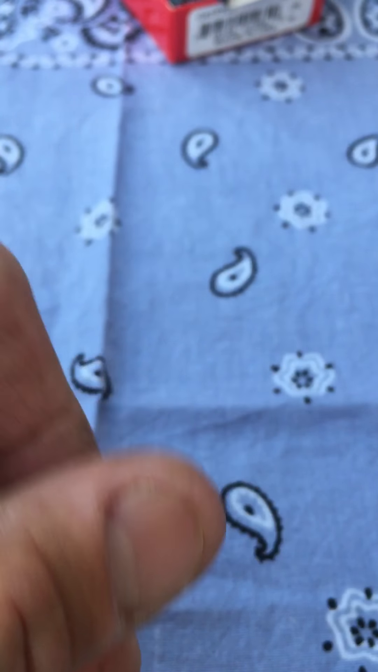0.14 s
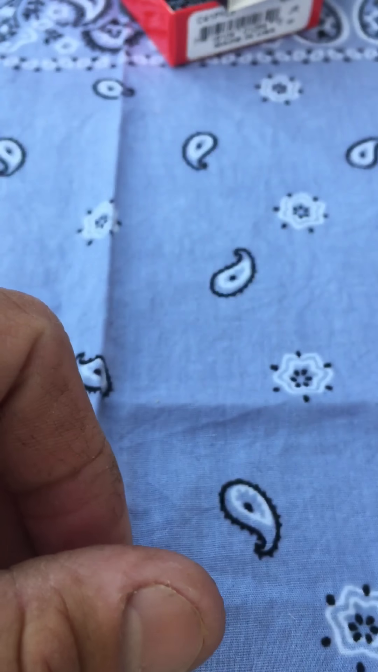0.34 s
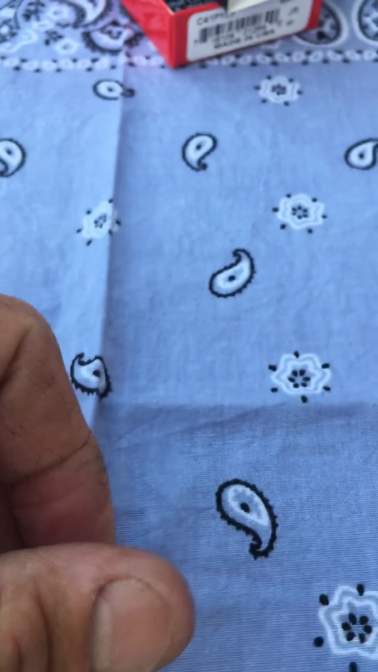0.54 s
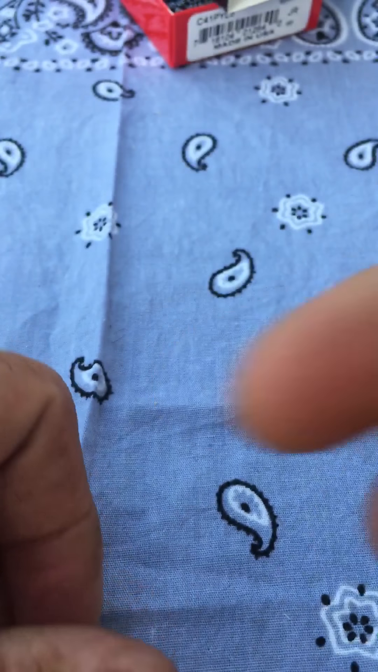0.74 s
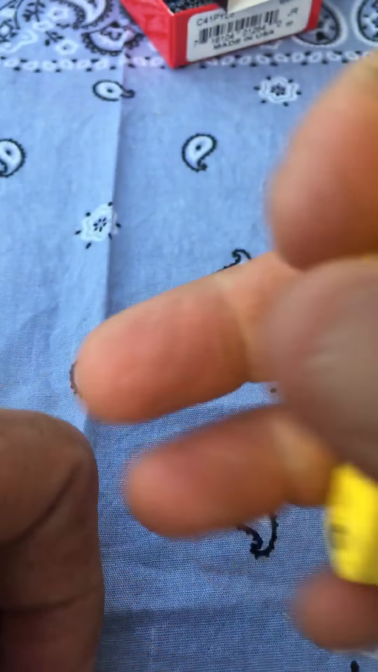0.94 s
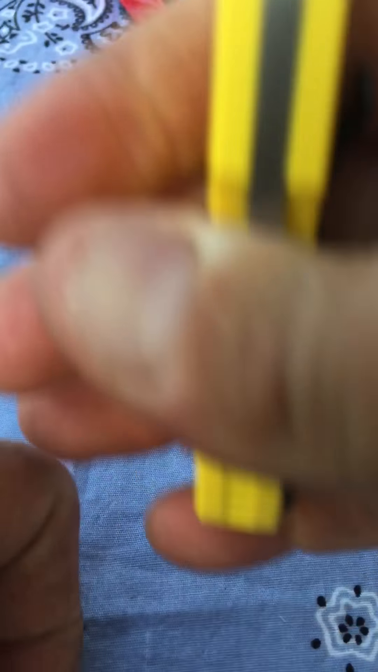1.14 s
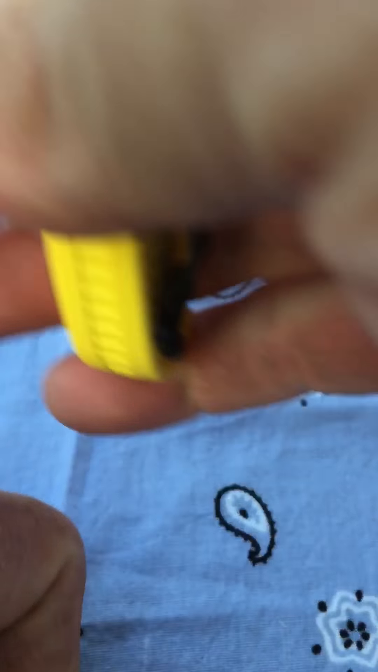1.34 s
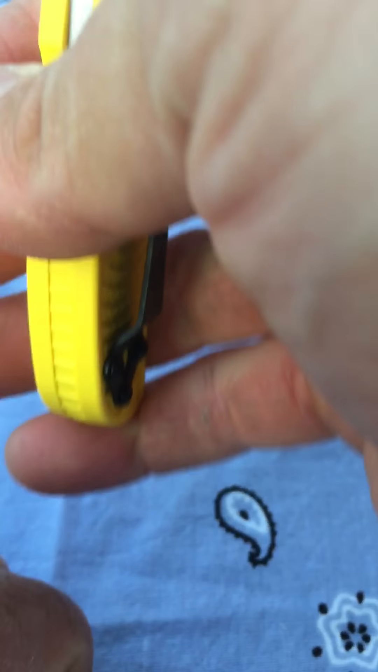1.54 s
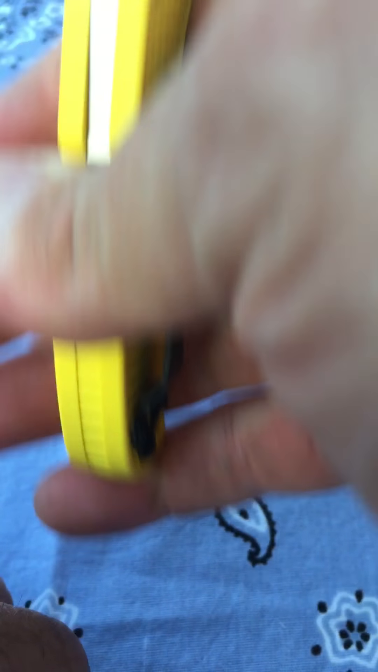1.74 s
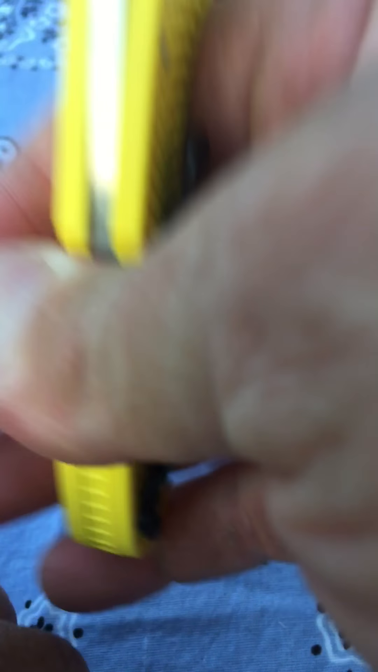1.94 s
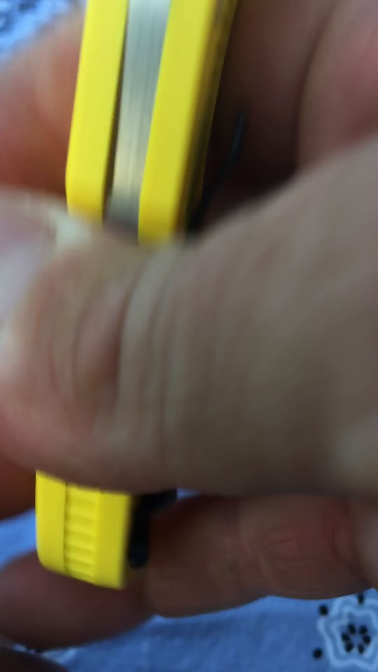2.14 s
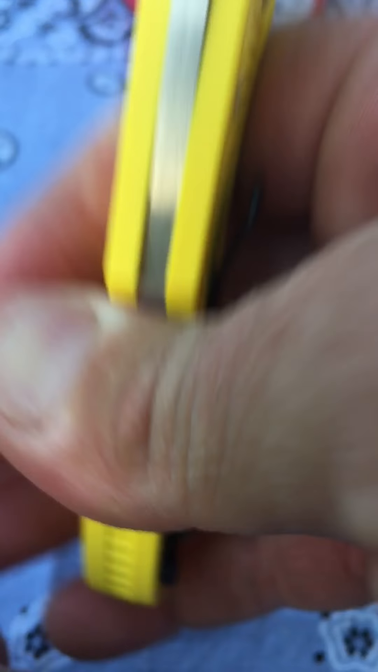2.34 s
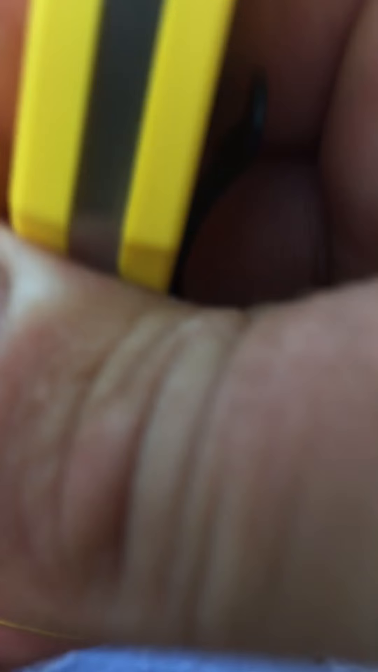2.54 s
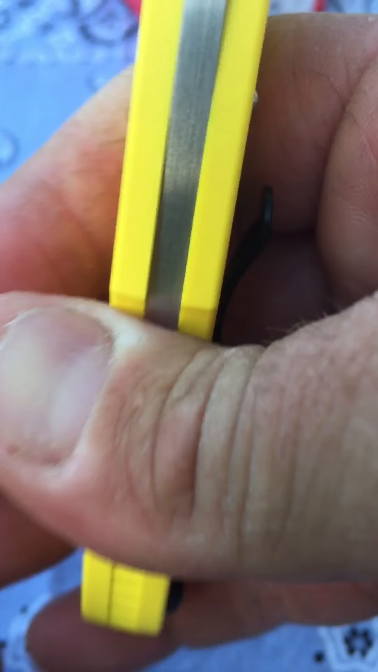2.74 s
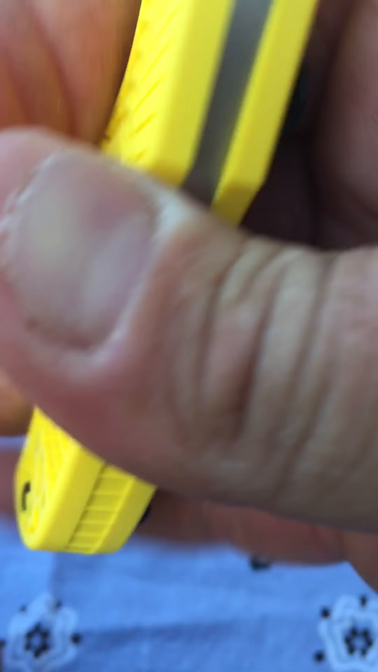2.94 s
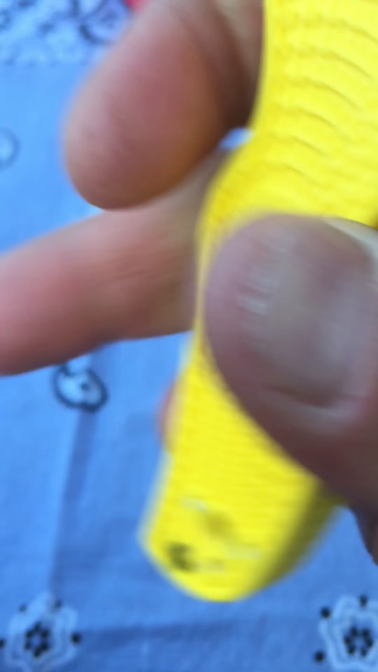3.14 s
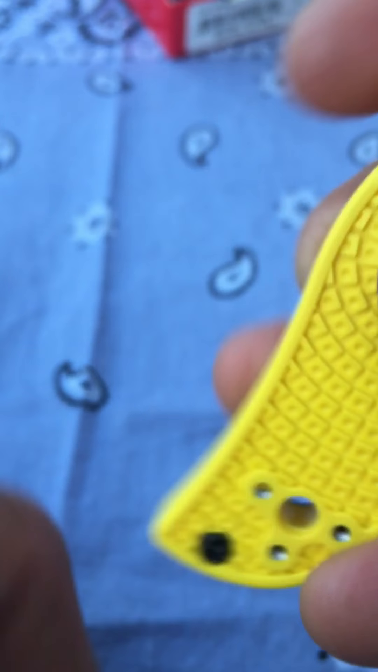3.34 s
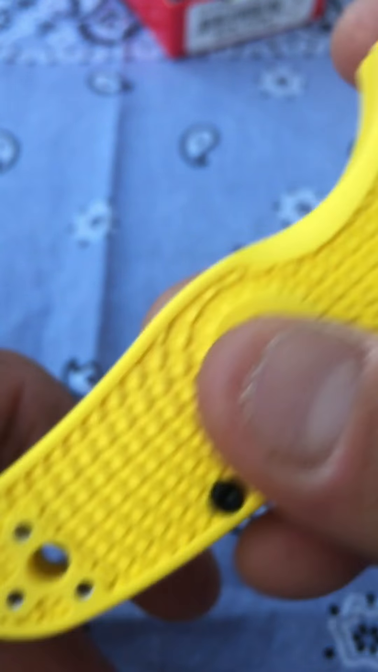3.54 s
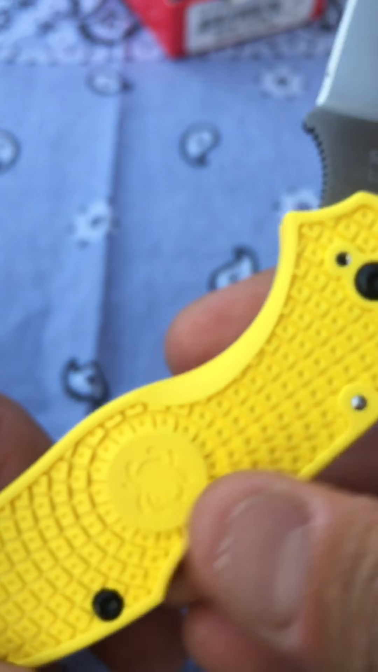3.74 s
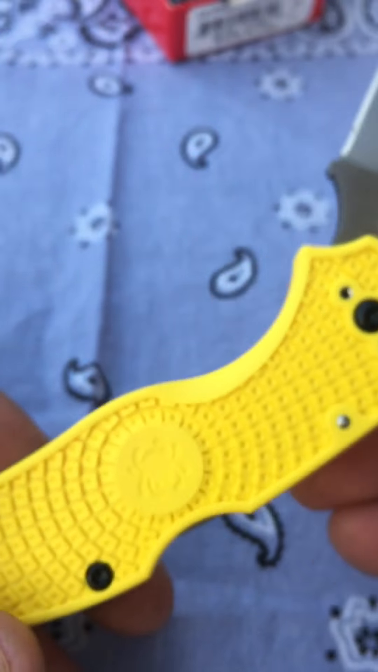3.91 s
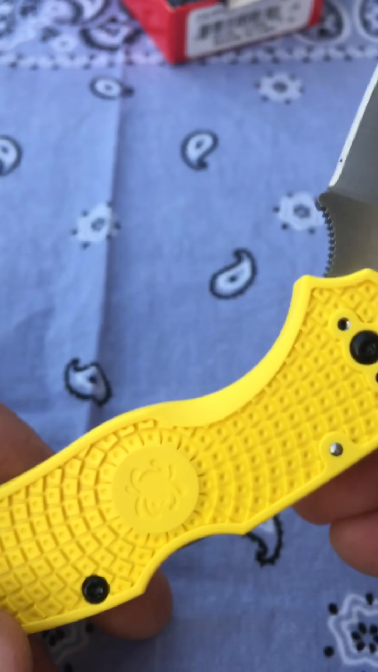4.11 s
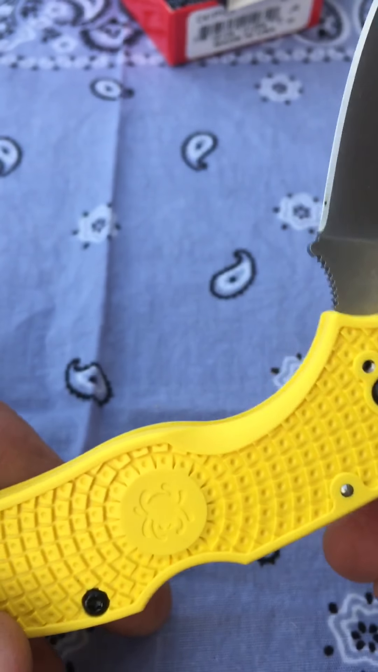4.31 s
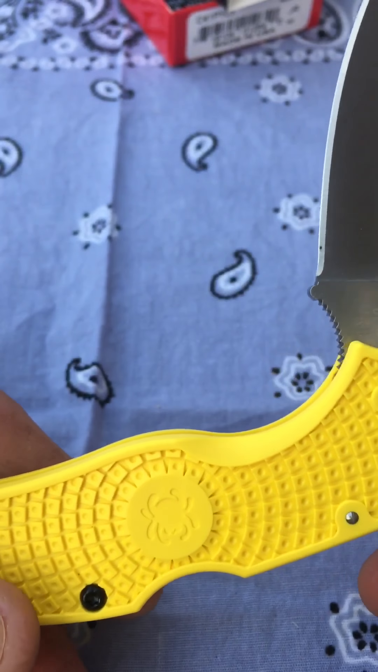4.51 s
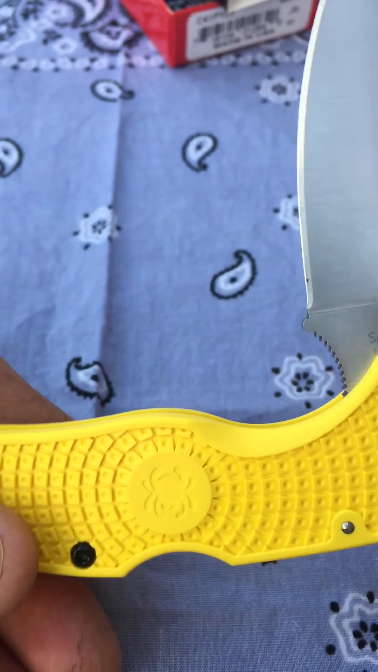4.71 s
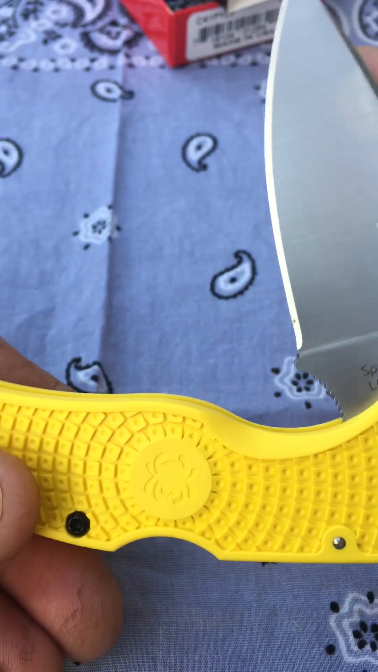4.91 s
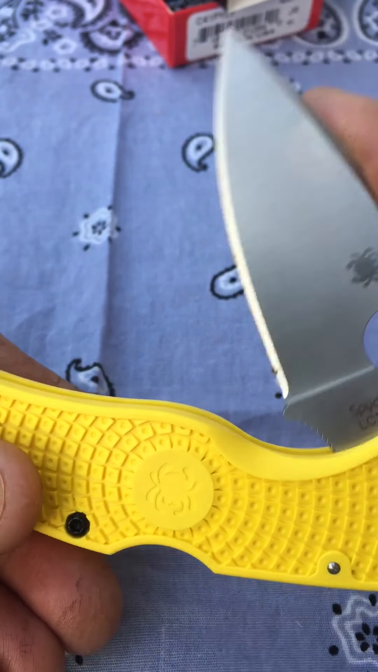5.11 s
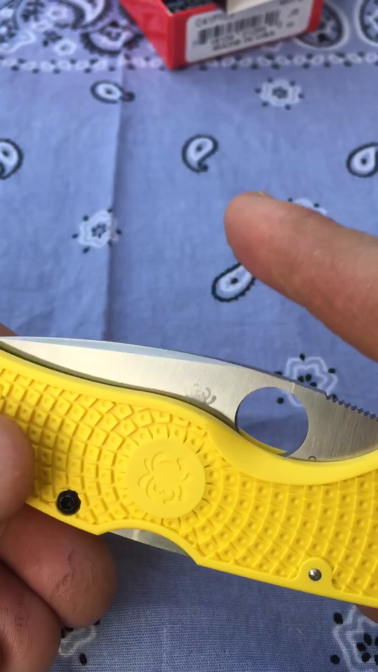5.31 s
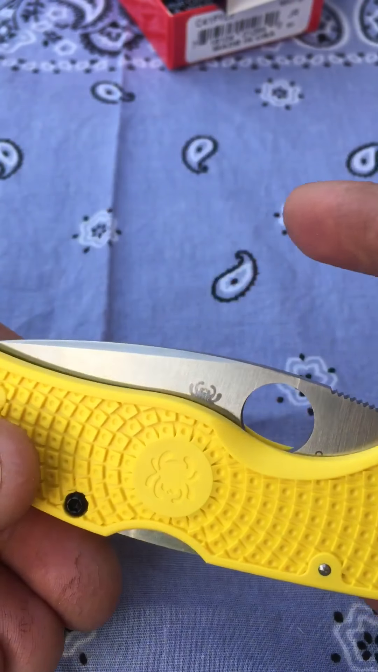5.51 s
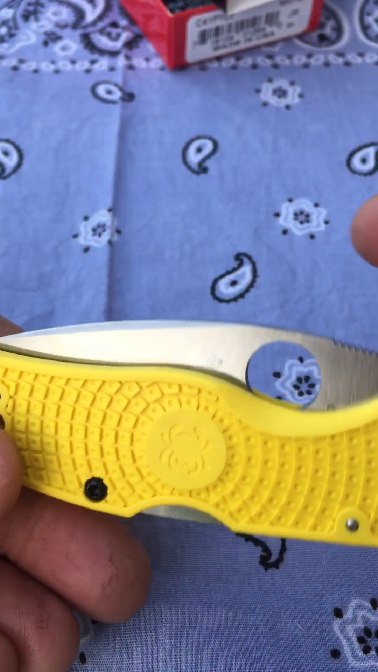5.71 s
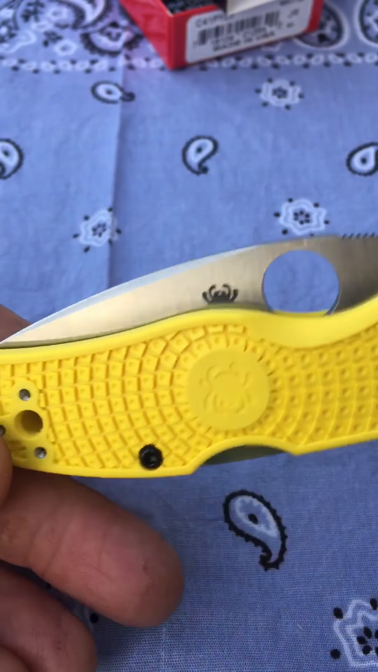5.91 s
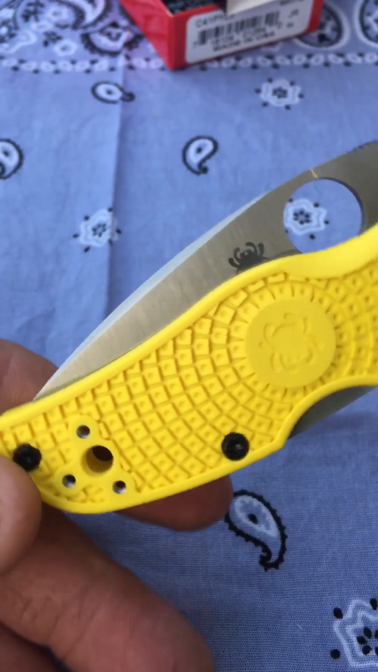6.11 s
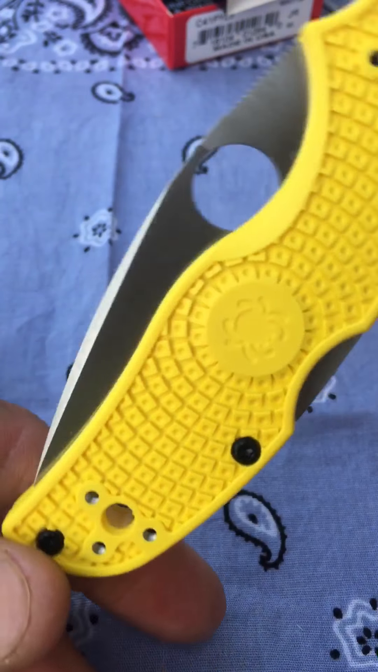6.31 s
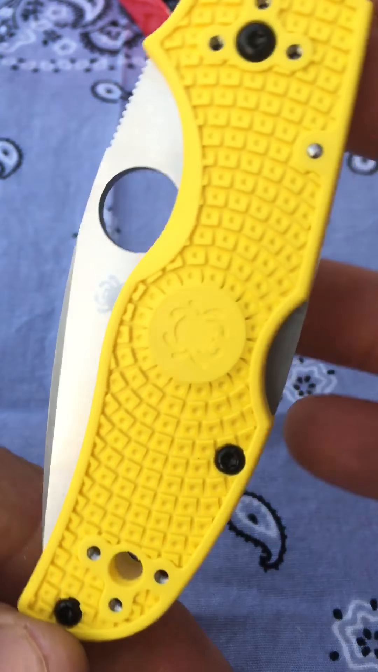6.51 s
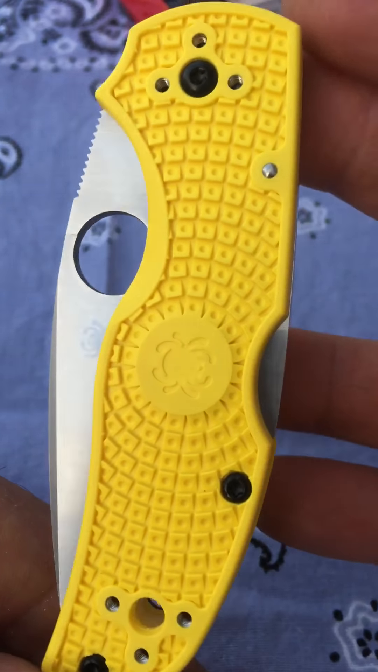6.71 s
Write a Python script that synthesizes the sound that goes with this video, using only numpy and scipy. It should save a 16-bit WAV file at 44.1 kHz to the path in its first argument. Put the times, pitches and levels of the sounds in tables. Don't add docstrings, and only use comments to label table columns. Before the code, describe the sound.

A folding knife is handled very close to a phone microphone at a table. Distant traffic and a labouring lorry rumble throughout. Skin rasps and squeaks over a ridged hollow plastic handle, with a few crisp clicks and a soft table bump. Quieter rubbing follows, then the blade slams shut with a loud, sharp snap, a quick rebound and a short ring, before faint rubbing over the rumble.

```python
import sys
import numpy as np
from scipy import signal
from scipy.fft import rfft, irfft, next_fast_len
from scipy.io import wavfile
from scipy.ndimage import uniform_filter1d, map_coordinates

SR = 44100
rng = np.random.default_rng(int(sys.argv[2]) if len(sys.argv) > 2 else 0)


def store_wav(level_fs):
    pcm = np.round(np.clip(np.atleast_2d(level_fs), -1, 1) * 32767)
    wavfile.write(sys.argv[1], SR, pcm.T.astype(np.int16))


def voltage_ratio(decibels):
    exponent = np.asarray(decibels, float) / 20
    return 10 ** exponent


N = 297763


def unit(x):
    return x / np.sqrt(np.mean(x ** 2) + 1e-20)


def along(points, hz):
    f, v = np.transpose(points)
    return np.interp(np.log(hz + 1), np.log(f + 1), v)


def curves(rows):
    s, *cols = np.transpose(rows)
    return [np.interp(np.arange(N) / SR, s, c) for c in cols]


def wobble(rate):
    knots = rng.standard_normal(int(N * rate / SR) + 4)
    return map_coordinates(knots, [np.arange(N) * rate / SR])


def swell(s, length, rise, fall):
    u = (np.arange(N) / SR - s) / length
    return np.clip(np.minimum(u / rise, (1 - u) / fall), 0, 1)


def filtered(x, response):
    m = next_fast_len(len(x) + 8192)
    return irfft(rfft(x, m) * response(np.fft.rfftfreq(m, 1 / SR)), m)[:len(x)]


def noise(spectrum):
    return unit(filtered(rng.standard_normal(N), lambda hz: voltage_ratio(along(spectrum, hz))))


def patchy(x, depth_db, size=(3, 14)):
    z = signal.stft(x, nperseg=256)[2]
    field = rng.standard_normal(z.shape)
    field = uniform_filter1d(field, size=size[0], axis=0)
    field = uniform_filter1d(field, size=size[1], axis=1)
    return signal.istft(z * voltage_ratio(depth_db * unit(field)), nperseg=256)[1][:N]


def band(x, lo_hz, hi_hz):
    return signal.sosfilt(signal.butter(2, [lo_hz, hi_hz], "bandpass", fs=SR, output="sos"), x)


def tone(hz, db, waver_hz):
    return np.sqrt(2) * voltage_ratio(db) * np.sin(2 * np.pi * np.cumsum(hz + waver_hz * wobble(30)) / SR)


def mode(t, hz, db, t60, phase=0):
    return voltage_ratio(db - 60 * t / t60) * np.sin(2 * np.pi * hz * t + phase)


def add(track, s, x):
    track[round(s * SR):][:len(x)] += x


# frequency in Hz, density in dB per Hz.
HISS_SPECTRUM = [(1470, -32.5), (2500, -6), (3030, -6), (4940, -11), (6280, -11), (7390, -16), (9110, -14),
                 (10400, -15.5), (14400, -20), (15900, -25.5)]


def hiss():
    return voltage_ratio(-72.5) * noise(HISS_SPECTRUM)


# time in seconds, strength in dB.
ROAD_FLOW = [(0.0, -46.5), (0.21, -46.5), (0.38, -49), (1.03, -50), (1.22, -52), (2.56, -53.5),
             (2.97, -50.5), (4.02, -53.5), (5.11, -47), (5.58, -48), (6.05, -46.5), (6.75, -48.5)]
# frequency in Hz, density in dB per Hz.
ROAD_SPECTRUM = [(250, -32.5), (430, 1.5), (538, 1), (659, 3.5), (825, -4), (956, 1.5), (1120, -0.5),
                 (1210, -7.5), (1450, -41.5), (1880, -44.5), (3190, -120)]
TYRE_SPECTRUM = [(790, -30), (1350, 3.5), (2210, -3), (3140, -18), (3480, -21.5), (4340, -30.5),
                 (5000, -34), (6500, -59), (11000, -120)]


def traffic():
    [flow_db] = curves(ROAD_FLOW)
    swing_db = flow_db - flow_db.mean()
    road = voltage_ratio(swing_db - 1.5 + 0.85 * wobble(6.4)) * patchy(noise(ROAD_SPECTRUM), 1.9)
    tyres = voltage_ratio(1.2 * swing_db - 9.5) * patchy(noise(TYRE_SPECTRUM), 2.7)
    return voltage_ratio(flow_db.mean()) * (road + tyres)


# time in seconds, effort in dB.
LORRY_EFFORT = [(0.0, -43.5), (0.49, -46.5), (0.9, -45.5), (1.2, -41.5), (2.48, -46.5), (2.71, -42.5),
                (2.86, -49), (3.1, -45), (3.57, -38.5), (3.97, -41), (4.81, -41.5), (5.04, -45),
                (5.55, -39), (5.73, -37.5), (5.9, -36.5), (6.75, -40.5)]
# frequency in Hz, density in dB per Hz.
RUMBLE_SPECTRUM = [(15, -44), (25, -13.5), (35, -18), (48, 9.5), (102, 0), (110, -1.5), (140, -39),
                   (240, -120)]
DRONE_SPECTRUM = [(53, -38.5), (90, -17.5), (129, 1.5), (156, -7.5), (199, -6.5), (250, -12), (320, -48.5),
                  (550, -120)]
PIPE_SPECTRUM = [(140, -39), (235, -8.5), (279, 0), (317, -3), (350, -1.5), (440, -10.5), (570, -41.5),
                 (970, -120)]
# start in seconds, length in seconds, pitch in Hz, level in dB.
ENGINE_NOTES = [(1.214, 0.15, 124, -40), (1.554, 0.37, 117.4, -45), (3.333, 0.17, 336, -47),
                (3.348, 0.18, 275, -45.5), (3.453, .24, 130, -41.5), (3.54, 0.14, 362, -44.5),
                (5.497, 0.22, 148.9, -42), (5.52, .22, 54, -36.5), (5.516, 0.37, 284, -44),
                (5.582, 0.406, 351.4, -44), (5.76, 0.29, 196, -42), (5.763, 0.24, 130.2, -39.5),
                (6.101, 0.45, 127, -39), (6.27, 0.17, 286.8, -47)]


def lorry():
    [effort_db] = curves(LORRY_EFFORT)
    swing_db = effort_db - effort_db.mean()
    x = voltage_ratio(0.49 * swing_db + 2) * unit(voltage_ratio(1.7 * wobble(14)) * noise(RUMBLE_SPECTRUM))
    x += voltage_ratio(swing_db - 2.5) * unit(voltage_ratio(1.5 * wobble(9)) * noise(DRONE_SPECTRUM))
    x += voltage_ratio(1.08 * swing_db - 8) * unit(voltage_ratio(2.4 * wobble(7)) * noise(PIPE_SPECTRUM))
    notes = sum(swell(s, length, 0.29, 0.16) * tone(hz, db, 3.5) for s, length, hz, db in ENGINE_NOTES)
    return voltage_ratio(effort_db.mean()) * x + notes


# time in seconds, pitch in Hz, level in dB.
CHIRP = [
    (2.933, 3300, -68),
    (2.945, 3750, -64),
    (2.965, 3970, -60),
    (2.985, 3670, -63),
    (2.998, 2900, -69),
]


def bird():
    start, end = CHIRP[0][0], CHIRP[-1][0]
    hoarse = voltage_ratio(5 * wobble(200)) * np.cos(1.5 * wobble(300))
    return swell(start, end - start, .1, .1) * hoarse * tone(*curves(CHIRP), 45)


# frequency in Hz, time to fall 60 dB in seconds.
ROOM_DECAY = [(500, 0.13), (3000, 0.24), (8000, 0.14), (12000, 0.047)]


def room(x):
    hz, t, z = signal.stft(rng.standard_normal(SR // 3), SR, nperseg=256)
    fade = voltage_ratio(-60 * t / along(ROOM_DECAY, hz)[:, None])
    tail = signal.istft(z * fade, SR, nperseg=256)[1]
    late = np.pad(x, (300, 0))
    return signal.fftconvolve(late, tail / np.linalg.norm(tail))[:N]


# start in seconds, level in dB, pitch in Hz,
# time to fall 60 dB in seconds.
TABLE_KNOCKS = [
    (2.764, -11.5, 170, 0.032),
    (2.77, -15, 116, 0.11),
    (2.783, -14, 91, 0.057),
    (2.7835, -22, 220, 0.022),
    (2.8027, -20.5, 990, 0.011),
]


def bump():
    track, t = np.zeros(N + SR), np.arange(SR // 5) / SR
    for s, db, hz, t60 in TABLE_KNOCKS:
        add(track, s, mode(t, hz, db, t60) * (1 - np.exp(-t / 0.0014)))
    return track[:N]


# start in seconds, length in seconds, level in dB,
# brightness in dB.
STROKES = [(0.022, 0.077, -68.5, -2), (0.12, 0.069, -70, 1.5), (0.22, 0.11, -65, -3),
           (0.522, 0.028, -65, -5.5), (0.598, 0.16, -62, -3), (0.718, 0.075, -59, -10),
           (0.768, 0.13, -64.5, -13), (0.878, 0.11, -69.5, 0.5), (0.955, 0.23, -51.5, -14),
           (1.083, 0.052, -49.5, -8), (1.12, 0.052, -67, -9), (1.197, 0.085, -53, -9.5),
           (1.564, 0.12, -67, -1.5), (2.314, 0.015, -51.5, -1), (2.365, 0.057, -68, 2),
           (2.75, 0.12, -56, -10), (3.037, 0.11, -49.5, -8.5), (3.132, .07, -60, -2),
           (3.228, 0.074, -54, 2.5), (3.292, 0.12, -55.5, -2), (3.407, 0.042, -69, -2),
           (3.438, 0.1, -61.5, 7), (3.525, 0.08, -55, -7.5), (3.583, 0.069, -70, 1),
           (3.857, 0.15, -62.5, -3.5), (4.31, 0.25, -63.5, -13), (4.6, 0.39, -62, -14),
           (5.17, 0.4, -56, -10.5), (5.575, 0.064, -79.5, 14.5), (6.052, 0.033, -85.5, 12.5),
           (6.22, 0.5, -60, -16)]
# frequency in Hz, width in Hz, level in dB.
HANDLE = [(2520, 40, 0), (3610, 130, -16.5), (4423, 83, -13.5), (6695, 46, -9.5), (7160, 37, -14),
          (9500, 240, -9)]


def rubbing():
    def hollow(f):
        return .5 + sum(voltage_ratio(db) / np.hypot(1, (f - hz) / (2.5 * width)) for hz, width, db in HANDLE)

    strokes = [(swell(s, length, 0.26, 0.28), length, db, bright_db) for s, length, db, bright_db in STROKES]
    catching = 1 - .75 * sum(shape > 0 for shape, length, *_ in strokes if length > 0.17)
    grains = rng.standard_normal(N) * voltage_ratio(catching * (3 * wobble(350) + 1.6 * wobble(70)))
    grit = patchy(patchy(filtered(grains, hollow), 2.4), 3.5, size=(1, 22))
    ranges_hz = [(2000, 4700), (4800, 9300), (9500, 15000)]
    dull, mid, bright = (unit(band(band(grit, lo, hi), lo, hi)) for lo, hi in ranges_hz)
    x = np.zeros(N)
    for shape, _, db, bright_db in strokes:
        colour = dull + voltage_ratio(bright_db) * mid + voltage_ratio(1.1 * bright_db - 6.5) * bright
        x += shape * voltage_ratio(db - 4.5) * colour
    return x


# start in seconds, length in seconds, pitch in Hz, level in dB.
HISSING_SLIPS = [(.146, 0.035, 11000, -70), (0.296, 0.025, 2300, -59), (0.287, 0.028, 6900, -64),
                 (.395, 0.0298, 4100, -70), (2.321, .005, 4100, -56), (2.38, .025, 13000, -72),
                 (1.178, .03, 3600, -67), (.397, 0.026, 2800, -62.5), (.518, 0.026, 4300, -65),
                 (.523, 0.016, 6600, -73), (.603, 0.045, 2760, -57), (.613, 0.023, 6800, -68),
                 (.652, 0.072, 5700, -69), (.733, 0.033, 2250, -49), (.735, 0.028, 7150, -64),
                 (0.897, 0.065, 6700, -67), (1.03, .02, 8800, -66), (1.03, 0.05, 6400, -66),
                 (1.062, 0.03, 4800, -58), (1.13, 0.045, 5000, -60), (1.092, .005, 2300, -47),
                 (1.109, .013, 2400, -47), (1.001, .01, 6400, -60), (1.003, .016, 8800, -62),
                 (.295, .005, 2200, -44), (1.095, .028, 4600, -57), (1.0015, .007, 2600, -49),
                 (1.168, .006, 2200, -50), (3.228, 0.053, 5800, -54.5), (3.53, 0.054, 3300, -58.5),
                 (3.624, .01, 4660, -67), (3.104, .006, 5700, -57), (3.596, .012, 10000, -63),
                 (3.612, 0.016, 8400, -72), (3.505, 0.017, 8500, -61), (1.22, 0.022, 3000, -58),
                 (3.15, 0.038, 3500, -64), (3.036, 0.079, 2300, -57), (3.093, 0.03, 6750, -58),
                 (3.23, 0.05, 7350, -56), (3.344, 0.028, 9100, -56.5), (3.501, 0.021, 6500, -52),
                 (3.8, .018, 8000, -71), (4.118, 0.047, 3300, -68), (5.4, 0.068, 6000, -63.5),
                 (5.604, .041, 5710, -80)]
SINGING_SLIPS = [(.96, .045, 2850, -58), (1.01, .05, 2700, -62), (1.065, .025, 2450, -55),
                 (1.12, .05, 2300, -55), (1.175, .055, 2050, -57), (.525, .025, 4500, -62),
                 (.53, .016, 6600, -65), (.53, .014, 7900, -69), (.288, .014, 3950, -57),
                 (.31, .025, 4700, -68), (5.617, .016, 5700, -72), (5.598, .035, 9100, -76),
                 (.745, .03, 3800, -62), (3.06, .07, 4500, -61), (3.232, .085, 3600, -55),
                 (3.33, .042, 3600, -54), (3.305, .06, 2500, -56), (3.3, .08, 4500, -65),
                 (3.41, .04, 6000, -70), (3.45, .065, 4550, -61), (3.465, .05, 2550, -61),
                 (3.46, .03, 3600, -61), (3.495, .024, 3650, -53), (2.94, .012, 6500, -71),
                 (3.8, .09, 5800, -74), (3.89, .045, 4500, -69), (3.935, .035, 4500, -62),
                 (3.94, .036, 14800, -72), (4.23, .05, 5050, -76), (4.35, .08, 5050, -75),
                 (4.47, .1, 5050, -78), (4.64, .07, 5000, -74), (5.17, .045, 6230, -75),
                 (5.22, .05, 5150, -72), (5.2, .14, 4200, -72), (5.29, .05, 3450, -69),
                 (5.3, .05, 6200, -73), (5.405, .15, 4290, -70), (5.403, .04, 3150, -63),
                 (5.95, .03, 3800, -70), (6.38, .02, 8200, -77), (6.41, .04, 4400, -71),
                 (6.44, .05, 5700, -75), (6.42, .2, 3000, -68)]


def slips():
    track = np.zeros(N + SR)
    friction = rng.standard_normal(N) * voltage_ratio(2.4 * wobble(120) + 1.4 * wobble(590))
    for rows, width_hz in [(HISSING_SLIPS, 620), (SINGING_SLIPS, 191)]:
        for s, length, hz, db in rows:
            piece = friction[round(s * SR):][:round(1.25 * length * SR)]
            song = filtered(piece, lambda f: 1 / (1 + np.abs((f - hz) / (width_hz / 2)) ** 1.4))
            add(track, s - 0.085 * length, voltage_ratio(db) * unit(song) * np.hanning(len(piece)) ** 0.15)
    return track[:N]


# start in seconds, peak in dB, note in Hz, crack in dB,
# brightness in dB.
SMALL_TICKS = [(1.0022, -28.5, 2700, -31, -1), (1.0964, -23, 2500, -24, -8),
               (1.1025, -21.5, 2450, -26, -10), (1.1074, -22, 2250, -21, -7), (1.1486, -32, 2350, -32, -12),
               (1.166, -29, 2200, -30, -12), (1.318, -35.5, 4030, -30, 2), (1.604, -43, 2000, -22, -9),
               (2.793, -36, 2220, -16, 1), (3.0392, -36, 2300, -32, -23), (3.0564, -31.5, 2400, -19, -1.5),
               (3.2713, -30, 3630, -20, 6), (3.391, -39, 2840, -22, 3), (4.9882, -39.5, 3700, -26, -10),
               (5.0499, -39, 3800, -29, -5), (5.0654, -40, 3760, -32, -1), (5.345, -64, 4297, -4, 12),
               (5.357, -62, 4330, -1, 5), (5.584, -54, 9100, -14, 14), (5.5938, -60, 9100, -16, 12),
               (6.1894, -63, 2155, -12, 11)]


def ticks():
    def peak(x):
        return x / np.abs(x).max()

    track, t = np.zeros(N + SR), np.arange(SR // 20) / SR
    for s, db, hz, crack_db, bright_db in SMALL_TICKS:
        crack = rng.standard_normal(len(t)) * voltage_ratio(-60 * t / 0.009) * (1 - np.exp(-t / .0003))
        note = mode(t, hz, 0, 0.0105) * (1 - np.exp(-t / .0004))
        parts = voltage_ratio(-bright_db) * peak(band(band(crack, 2010, 2805), 1900, 2900))
        parts += voltage_ratio(6.0) * peak(band(crack, 4200, 6020))
        parts += voltage_ratio(bright_db) * peak(band(crack, 6800, 11500))
        add(track, s, voltage_ratio(db + 6.5) * (voltage_ratio(crack_db) * parts + 0.3 * note))
    return track[:N]


# start in seconds, peak in dB.
METAL_CONTACTS = [
    (0.2201, -20),
    (1.243, -12.5),
    (1.5527, -14.5),
    (2.3160, -36.5),
    (2.774, -21.5),
]
# frequency in Hz, level in dB,
# time to fall 60 dB in seconds.
CONTACT_MODES = [
    [(2300, -16, 0.01), (5830, -0.5, 0.0032), (7710, 10.5, 0.0023), (9640, 1, 0.0046), (11940, -2, 0.0046),
     (14800, -5.5, 0.0041)],
    [(2190, -2.5, 0.012), (3530, -1.5, 0.006), (4780, -16, 0.0064), (5870, -13, 0.0074), (7800, -19, 0.006),
     (8700, -19, .006), (12400, -27, .005), (13700, -25, 0.004), (15200, -27, .005)],
    [(2240, -3.5, 0.013), (2960, 5, 0.0043), (5000, -2, 0.0071), (7040, -0.5, 0.0051), (8360, 0, 0.003),
     (4600, -6.5, 0.0053), (5700, -13, .007), (12700, -22, .003), (14500, -20, .004), (15600, -24, .004)],
    [(2540, -8, .008), (4340, 4, 0.012), (6600, -4, .008), (7840, -1, 0.0098), (9400, 0, 0.016),
     (12200, -4, .006)],
    [(2380, 6.5, 0.0054), (4180, 0, 0.0075), (5850, 3.5, 0.0038), (9550, -8, .007), (11900, -5, .006),
     (13530, -4, .006)],
]


def clicks():
    track, t = np.zeros(N + SR), np.arange(SR // 30) / SR
    for (s, db), modes in zip(METAL_CONTACTS, CONTACT_MODES):
        chatter = rng.standard_normal(len(t)) * voltage_ratio(-60 * t / 0.0094)
        ring = sum(mode(t, hz, level, t60) * (1 - np.exp(-(t * hz / 1.75) ** 2)) for hz, level, t60 in modes)
        ring = ring / (1 + (t / .0045) ** 4)
        x = ring / np.abs(ring).max() + 0.14 * band(band(chatter, 2200, 9300), 2200, 14500)
        add(track, s, voltage_ratio(db) * band(band(x, 1870, 17500), 1840, 17500))
    return track[:N]


# start in seconds, peak in dB, share of body, of blade,
# of lock bar.
CLOSING = [
    (5.3678, 3, 1, .02, .1),
    (5.3702, -14, .3, .02, 2.2),
    (5.3755, -13, .9, 1, .05),
]
# frequency in Hz, level in dB,
# time to fall 60 dB in seconds.
BLOW_MODES = [(274.7, -29, 0.03), (640, -21.5, 0.034), (1490, -25, 0.021), (1841, -14.5, .016),
              (9700, -11.5, .008), (3486, -2, 0.0046), (4470, -5.5, .004), (4835, 4.5, 0.0057),
              (5900, -2, 0.0071), (7590, -12.5, 0.014), (8950, -6.5, .011), (11300, -10, .014),
              (13020, -13.5, 0.01), (15200, -9, .006)]
REBOUND_MODES = [(400, -23.5, .02), (900, -22.5, 0.018), (1720, -14, 0.0301), (2172, -15, .03),
                 (3400, -6, .02), (3735, -3.5, .024), (4603, -6, .028), (5017, -7.5, 0.022),
                 (5870, -9.5, .035), (7628, -18, .03), (8807, -9.5, .022), (11540, -6, .014),
                 (13270, -11, .01), (15320, -12, .008)]
BLADE_MODES = [(2900, 0.5, 0.1), (3060, -14, .03)]


def snap():
    track, t = np.zeros(N + SR), np.arange(SR // 3) / SR
    bar = mode(t, 3440 + 58000 * t, 0, 0.015)
    ring = sum(mode(t, hz * (1 + .9 * t), level, t60) for hz, level, t60 in BLADE_MODES)
    ring = ring / (1 + (t / .0225) ** 16)
    for (s, db, slam, blade, lock), modes in zip(CLOSING, [BLOW_MODES, BLOW_MODES, REBOUND_MODES]):
        phases = rng.uniform(0, 1.3, len(modes))
        body = sum(mode(t, hz, level, t60, a) for (hz, level, t60), a in zip(modes, phases))
        crack = band(rng.standard_normal(len(t)), 4100, 13000) * voltage_ratio(-60 * t / 0.014)
        crack += 0.29 * band(rng.standard_normal(len(t)), 248, 2200) * voltage_ratio(-60 * t / 0.03)
        choke = 1 if modes is REBOUND_MODES else 1 / (1 + ((t + s - CLOSING[0][0]) / 0.0056) ** 6)
        struck = choke * (slam * (0.83 * body + 0.7 * crack) + 1.5 * lock * bar)
        add(track, s, voltage_ratio(db) * (struck + 0.36 * blade * ring) * (1 - np.exp(-t / 0.00019)))
    return track[:N]


def scene():
    small, big = ticks() + clicks(), snap()
    space = room(voltage_ratio(-24.5) * small + voltage_ratio(-28) * big)
    hands = rubbing() + slips() + bump()
    return (small + big + space + hands + bird() + traffic() + lorry() + hiss())[None]


# time in seconds, depth in dB, hold in seconds.
GAIN_DIPS = [
    (2.84, 0, 0.1),
    (5.37, 2.5, 0.15),
]


def gain_control(x):
    t = np.arange(N) / SR
    duck_db = 0
    for s, depth_db, hold in GAIN_DIPS:
        duck_db = duck_db + depth_db * np.clip((t - s) / 0.044, 0, 1) * np.clip((s + hold - t) / 0.082 + 1, 0, 1)
    return x * voltage_ratio(-duck_db)


# frequency in Hz, gain in dB.
MIC_RESPONSE = [(20, -20), (45, -0.5), (9300, 0.5), (10400, -4), (11500, 0), (15800, 3.5), (16500, -6.5),
                (17000, -50)]


def microphone(x):
    return filtered(x, lambda hz: voltage_ratio(along(MIC_RESPONSE, hz)))


def low_pass(x):
    return signal.sosfilt(signal.butter(12, 16570, fs=SR, output="sos"), x)


def record(dry):
    level = gain_control(dry[0])
    clipped = level / (1 + np.abs(level / .86) ** 8) ** (1 / 8)
    return low_pass(microphone(clipped)[None])


dry = scene()
out = record(dry)
store_wav(out)
```